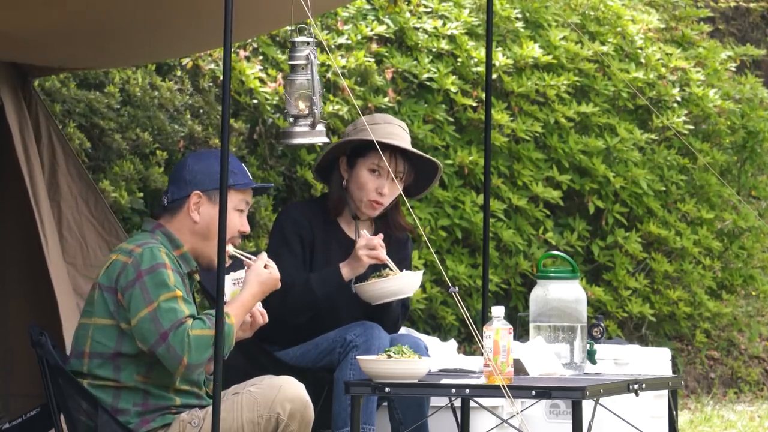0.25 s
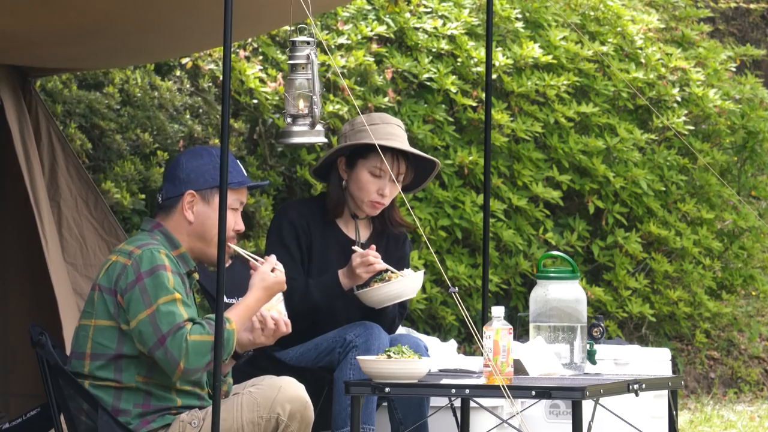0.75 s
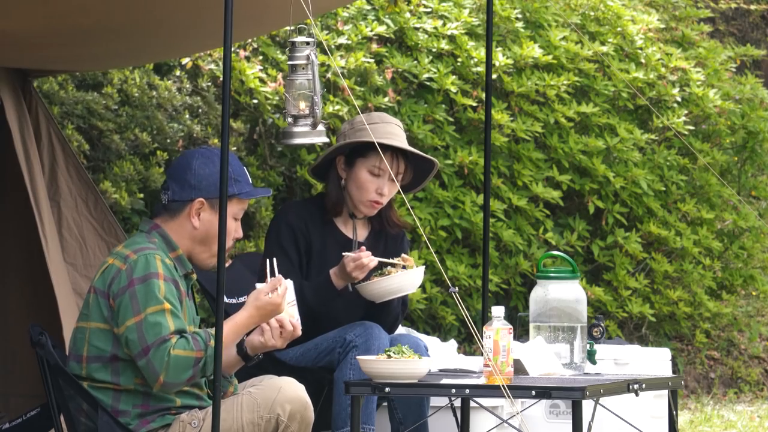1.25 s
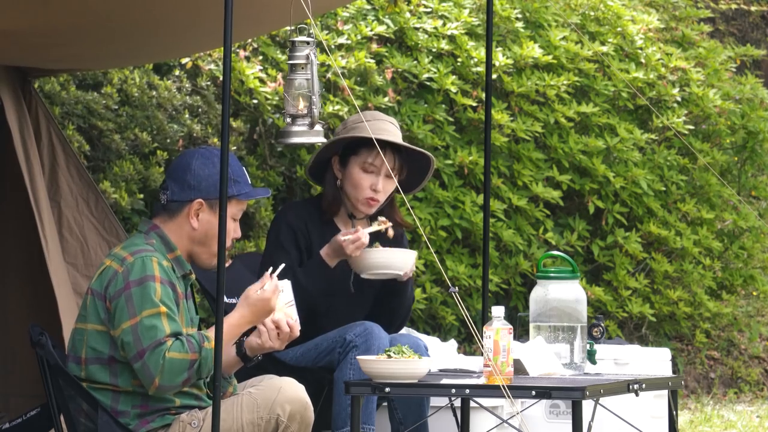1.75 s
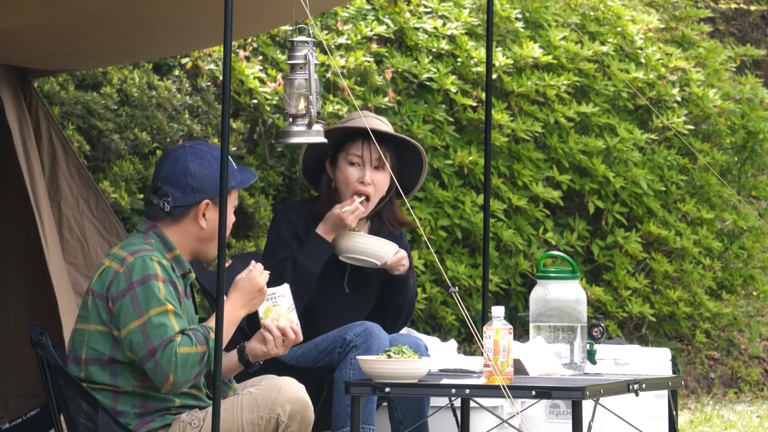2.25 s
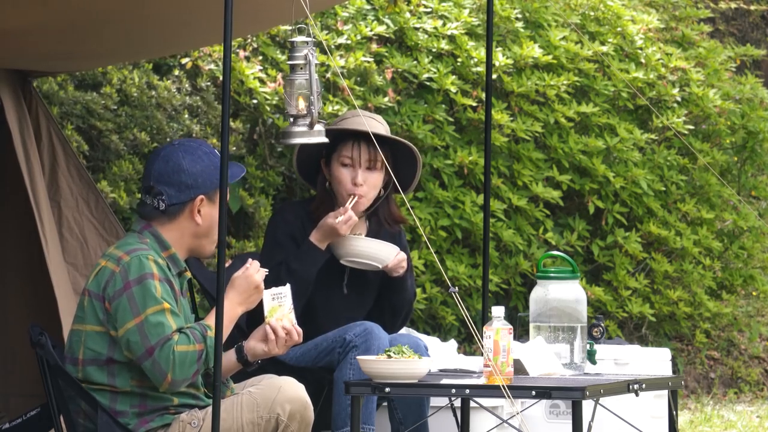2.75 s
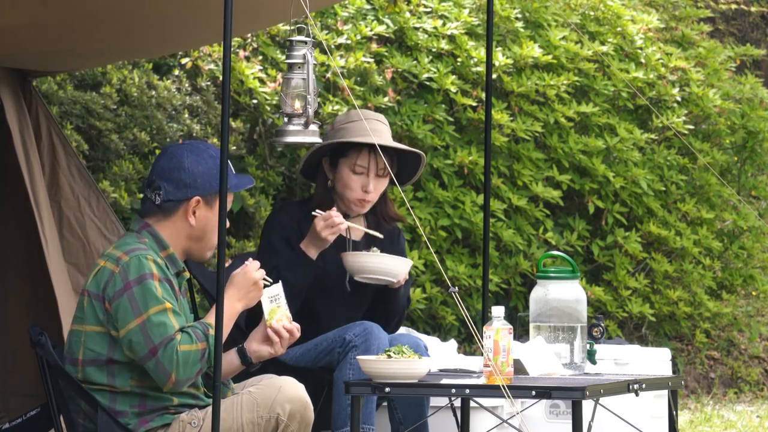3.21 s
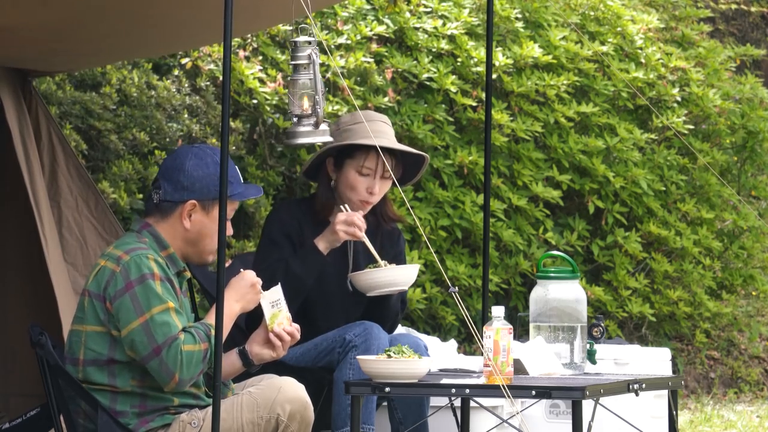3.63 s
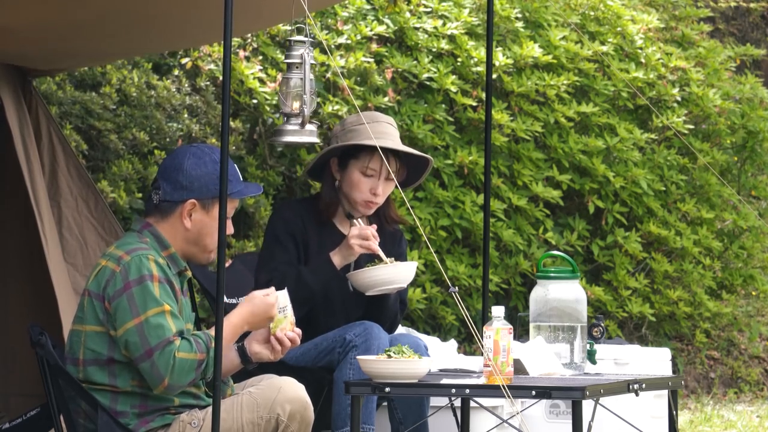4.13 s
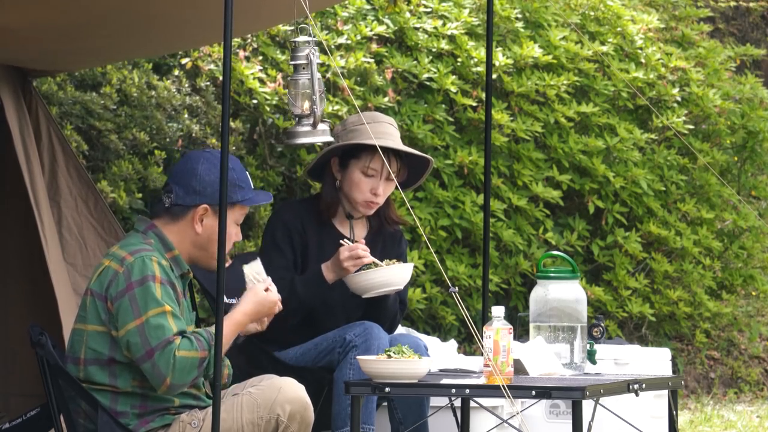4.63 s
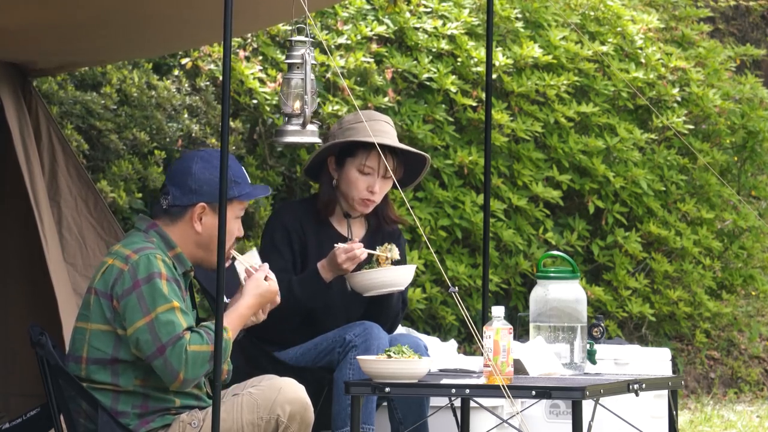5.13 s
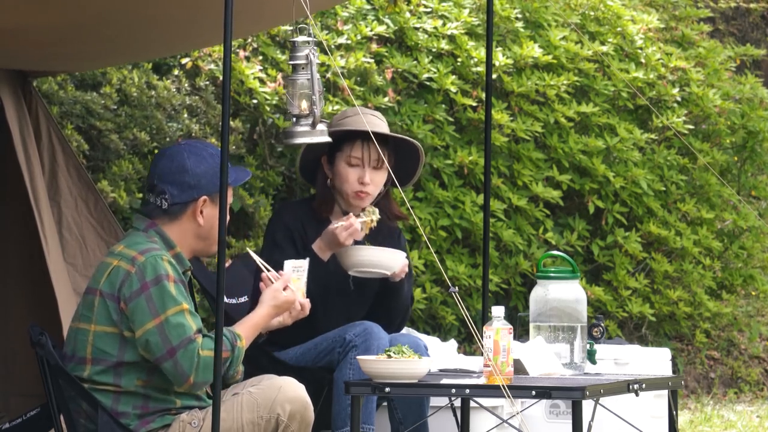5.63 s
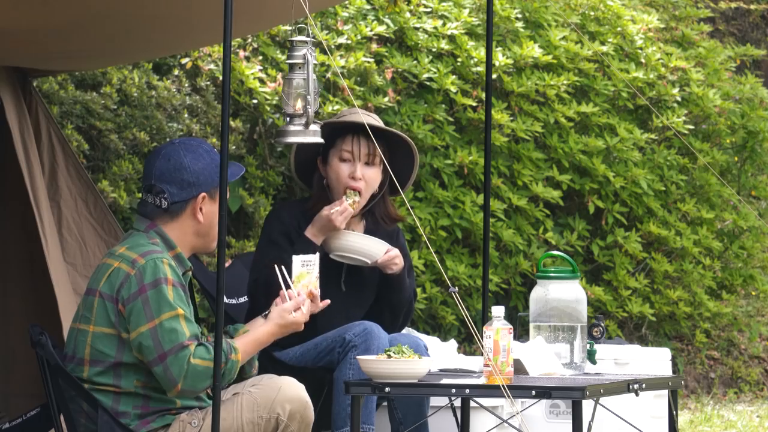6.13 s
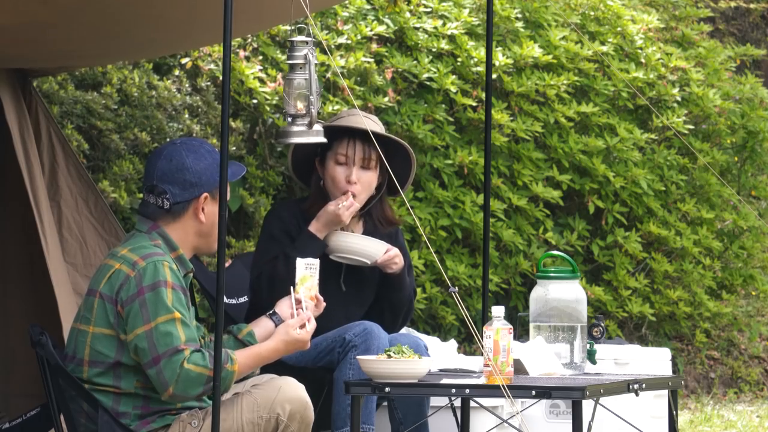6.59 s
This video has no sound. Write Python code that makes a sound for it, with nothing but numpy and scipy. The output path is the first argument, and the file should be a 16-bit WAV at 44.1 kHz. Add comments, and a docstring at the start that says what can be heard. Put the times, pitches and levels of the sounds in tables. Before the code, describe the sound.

Outdoors at a camp site beside a leafy hedge, strong gusts strike an unprotected microphone. Very deep, soft-edged thumps and low flutter dominate, surging around one second, strongest near three and a half to four, then again towards the end. Between gusts the rumble falls away, leaving a quiet, smooth rush of trees and a fine, dense rustle of near leaves straight ahead.

```python
"""A camp site beside a tall hedge, in gusty wind, with a two-port microphone out in the flow.
On the microphone, large eddies thump and small ones flutter: noise in bands, driven by the wind's strength.
Just after a gust peaks the flutter is at its finest, as large eddies take a moment to break up.
Behind, from straight ahead, the trees give a smooth rush of noise
and the near leaves a dense rustle of tiny ticks over hiss, which slowly dulls."""
import sys
import numpy as np
from scipy import signal
from scipy.fft import rfft, irfft, next_fast_len
from scipy.io import wavfile
from scipy.ndimage import uniform_filter1d

SR = 44100
rng = np.random.default_rng(int(sys.argv[2]) if len(sys.argv) > 2 else 0)


def wav_out(sig):
    """Save sig, one row per channel (or a flat mono array), as 16-bit PCM at SR to the path in sys.argv[1]."""
    wavfile.write(sys.argv[1], SR, np.round(np.clip(np.atleast_2d(sig).T, -1, 1) * 32767).astype(np.int16))


N = 302526

# Strength of the wind at the microphone, in four gusts:
# (time [s], level above the average breeze [dB])
WIND_STRENGTH = [(0.0, -2.5), (0.25, -3), (0.55, 3), (0.87, 4.5), (1.25, 1.5), (1.55, -7.0), (2.2, -4.5),
                 (2.65, -12), (3.05, -2.5), (3.4, 2), (3.72, 10), (3.98, 4.5), (4.35, -5.5), (4.8, -14.5),
                 (5.25, -1.5), (5.8, 4.5), (6.08, -0.5), (6.45, 0), (6.68, 5.5), (6.86, -1)]
# Single eddies that slap the microphone, before the slap gains set in scene():
# (time [s], deep thump level [dB], flutter level [dB])
EDDY_SLAPS = [(0.25, -7, -32), (0.39, -8.5, -29), (0.51, -17, -25), (0.79, -5.5, -25.5), (0.87, -24, -22),
              (1.19, -11.5, -24), (1.41, -8.5, -31), (1.78, -15, -34), (2.95, -15, -41), (3.23, -17, -20.5),
              (3.47, -12.5, -21), (3.61, -10, -17), (3.74, -6.5, -17), (3.94, -18, -19), (4.08, -9.5, -39),
              (4.18, -11.5, -38), (5.01, -10.5, -38), (5.28, -13, -29), (5.5, -9, -36), (5.64, -8, -24),
              (5.79, -22, -21), (5.9, -16.5, -20), (6.21, -8, -44), (6.35, -9, -38), (6.5, -7, -33),
              (6.66, -34, -22)]
# Spectrum of the large eddies, before tilt: (frequency [Hz], relative density [dB per Hz])
THUMP_SPECTRUM = [(8, -2), (14, 0.5), (22, 1.5), (32, -8), (45, -14), (64, -52), (90, -35), (130, -54)]
# Spectrum of the small eddies, before tilt: (frequency [Hz], relative density [dB per Hz])
FLUTTER_SPECTRUM = [(35, -8.5), (52, 2), (70, -2.5), (95, -8), (125, -11.5), (170, -22.5), (240, -33.5),
                    (400, -65)]
# Wind in the foliage, before the two trims below:
# (time [s], rush of the trees level [dB], rustle of the near leaves level [dB])
FOLIAGE_LEVELS = [(0.0, -40.5, -39.5), (0.25, -40.5, -40), (0.8, -39, -39.7), (1.6, -40, -41),
                  (2.6, -38.5, -40.5), (3.6, -37.6, -39), (3.72, -39.5, -40.5), (4.3, -39, -41.5),
                  (5.1, -38.1, -40.3), (6.3, -38, -40.0), (6.45, -40.5, -42), (6.86, -40.4, -42.5)]
# Spectrum of the rush in the trees: (frequency [Hz], relative density [dB per Hz])
TREE_SPECTRUM = [(60, 6), (130, 0.5), (220, 2), (310, -0.2), (430, -2.5), (540, -1.8), (680, -0.1),
                 (850, -1.5), (1100, -2.5), (1600, -4.5), (2200, -7), (3000, -12), (4500, -20.5)]
# Spectrum of the near leaves, before tilt: (frequency [Hz], relative density [dB per Hz])
LEAF_SPECTRUM = [(1800, -10.5), (2600, -2.5), (3300, -2), (4000, 0.04), (4600, 0.6), (5200, -0.7),
                 (5900, -4.5), (7000, -7), (8500, -10.5), (10000, -16), (12500, -23), (15500, -29.3)]

# Level in the average breeze [dB] and gain per dB of wind: small eddies grow faster than large ones
THUMP_DB, THUMP_PER_WIND = -17.5, 0.32
FLUTTER_DB, FLUTTER_PER_WIND = -32, 0.94
# Rise and fall of a slap [s]: the deep thump outlasts its flutter
THUMP_ATTACK_S, THUMP_RELEASE_S = 0.038, 0.049
FLUTTER_ATTACK_S, FLUTTER_RELEASE_S = 0.019, 0.02
# Tilt of the flutter in still air and its rise from there to the average breeze [dB per octave]
FINENESS_DB, FINENESS_PER_WIND = -7.5, 3.6
BREAKUP_S = 0.09  # delay while large eddies break up
OVERLOAD = 0.95  # limit of the microphone, full scale = 1
TREES_TRIM_DB, LEAVES_TRIM_DB = 1.59, 0.2
# Treble tilt of the rustle at the start [dB per octave] and its steady fall per second
CRISPNESS_DB, DULLING_DB_PER_S = 0.83, 0.27
CUTOFF_HZ = 15500


def buffeting(wind_db, large, small):
    """Wind on the microphone: the faster the air, the smaller the eddies and the higher the rumble reaches."""
    t = np.arange(N) / SR
    delayed_wind_db = np.interp(t - BREAKUP_S, t, wind_db)
    fineness_db = FINENESS_DB + FINENESS_PER_WIND * from_db(delayed_wind_db)
    thump = large * eddies(THUMP_SPECTRUM, 0.24 * fineness_db, pivot_hz=22, lumpy_db=0.8, span_s=0.093)
    flutter = small * eddies(FLUTTER_SPECTRUM, fineness_db, pivot_hz=75, lumpy_db=1.5, span_s=0.071)
    # the two ports feel nearly the same pressure, the left one a little more of the large eddies
    port_gains = from_db(0.17 * np.array([[1], [-1]]))
    return thump * port_gains + flutter


def port_swirl(large, small):
    """A little of the turbulence, mostly the deepest, pushes on one port while it pulls on the other."""
    deep_eddies = eddies(THUMP_SPECTRUM, -8.0, pivot_hz=22, lumpy_db=-1.0, span_s=0.13)
    fine_eddies = eddies(FLUTTER_SPECTRUM, 0, pivot_hz=75, lumpy_db=1, span_s=0.15)
    swirl = large * from_db(-14.5) * deep_eddies + small * from_db(-26) * fine_eddies
    return swirl * [[1], [-1]]


def turbulence(wind_db, thump_uneven_db, flutter_uneven_db, lumps_per_s, thump_slap_db, flutter_slap_db):
    """Strength of the large and the small eddies: both follow the wind in uneven lumps, with slaps on top."""
    large = from_db(THUMP_DB + THUMP_PER_WIND * wind_db + thump_uneven_db * drift(lumps_per_s))
    small = from_db(FLUTTER_DB + FLUTTER_PER_WIND * wind_db + flutter_uneven_db * drift(lumps_per_s))
    thump_slaps = from_db(thump_slap_db) * slaps(1, THUMP_ATTACK_S, THUMP_RELEASE_S)
    flutter_slaps = from_db(flutter_slap_db) * slaps(2, FLUTTER_ATTACK_S, FLUTTER_RELEASE_S)
    return np.hypot(large, thump_slaps), np.hypot(small, flutter_slaps)  # powers add


def slaps(column, attack_s, release_s):
    """Strength of the single eddies over time: each swells and dies away as a rounded bump."""
    t = np.arange(N) / SR
    power = 0
    for row in EDDY_SLAPS:
        age = t - row[0]
        width_s = np.where(age < 0, attack_s, release_s)
        bump = np.exp(-np.minimum((age / width_s) ** 2, 50))
        power = power + from_db(row[column]) ** 2 * bump
    return np.sqrt(power)


def eddies(spectrum, tilt_db, pivot_hz, lumpy_db, span_s):
    """Turbulent pressure: eddies of each size come in lumps; a rising tilt favours the small ones."""
    shared_lumps = drift(16)
    pressure = 0
    for hz, band in bands(rng.standard_normal(N), spectrum, count=7):
        level_db = tilt_db * np.log2(hz / pivot_hz) + lumpy_db * (shared_lumps + drift(9.1))
        pressure = pressure + band * from_db(level_db)
    return steadied(pressure, span_s)


def steadied(x, span_s):
    """Hold the short-term power of a turbulent flow near 1, so that the gust alone sets its strength."""
    power = abs(signal.hilbert(x, next_fast_len(N))[:N]) ** 2 / 2
    width = max(int(span_s * SR), 2)
    smooth_power = uniform_filter1d(uniform_filter1d(power, width), width)
    return x / np.sqrt(smooth_power + 1e-20)


def rounded(pressure):
    """The strongest thumps drive the microphone to its limit, which rounds their tops."""
    return pressure / (1 + (pressure / OVERLOAD) ** 6) ** (1 / 6)


def leaves(touches_per_s, spread_db, patchy_db, pivot_hz):
    """Near leaves brush each other: dense tiny ticks of uneven size over a bed of hiss."""
    tilt_db = CRISPNESS_DB - DULLING_DB_PER_S * np.arange(N) / SR
    sizes = from_db(spread_db * np.minimum(rng.exponential(1, N), 4))
    signed_sizes = sizes * rng.choice([-1, 1], N)
    ticks = rms_one(signed_sizes * (rng.random(N) < touches_per_s / SR))
    hiss = rng.standard_normal(N)
    rustle = 0
    for hz, band in bands(0.67 * ticks + hiss, LEAF_SPECTRUM, count=10):
        octaves_up = max(np.log2(hz / pivot_hz), 0)  # the tilt acts above the pivot only
        rustle = rustle + band * from_db(tilt_db * octaves_up + patchy_db * drift(11.0))
    return rms_one(rustle)


def trees(patchy_db):
    """Countless far leaves merge into a smooth rush that wavers slightly from band to band."""
    rush = 0
    for hz, band in bands(rng.standard_normal(N), TREE_SPECTRUM, count=12):
        rush = rush + band * from_db(patchy_db * drift(4.6))
    return rms_one(rush)


def bands(source, spectrum, count):
    """Colour a source and split it into overlapping neighbour bands: (centre Hz, signal) for each."""
    size = next_fast_len(N)
    hz = np.maximum(np.arange(size // 2 + 1) * SR / size, 1)
    coloured = rfft(source, size) * from_db(at_hz(spectrum, hz))
    centres = np.geomspace(spectrum[0][0], spectrum[-1][0], count)
    place = np.log(hz / centres[0]) / np.log(centres[1] / centres[0])  # in band spacings
    for k, centre in enumerate(centres):
        triangle = np.maximum(1 - abs(place - k), 0)
        yield centre, irfft(coloured * triangle, size)[:N]


def drift(rate):
    """Slow chance with spread 1, changing roughly rate times a second."""
    step = 40  # samples between the points drawn
    r = np.exp(-2 * np.pi * rate * step / SR)
    noise = rng.standard_normal(N // step + 2002)
    slow = signal.lfilter([1], [1, -2 * r, r * r], noise)[2000:]  # drop the filter's start
    return np.interp(np.arange(N) / step, np.arange(len(slow)), rms_one(slow))


def in_time(rows):
    """Each column of a curve at every sample."""
    s, *columns = np.transpose(rows)
    return [np.interp(np.arange(N) / SR, s, c) for c in columns]


def at_hz(points, hz):
    """Read a spectrum on a log-frequency axis."""
    point_hz, point_db = np.transpose(points)
    return np.interp(np.log(hz), np.log(point_hz), point_db)


def from_db(db):
    """Decibels to gain."""
    return 10 ** (np.asarray(db) / 20)


def rms_one(x):
    """Scale to rms 1."""
    return x / np.sqrt(np.mean(x ** 2) + 1e-20)


def scene():
    """The wind blows on the microphone itself; the foliage lies straight ahead."""
    wind_db, = in_time(WIND_STRENGTH)
    large, small = turbulence(wind_db, thump_uneven_db=2.2, flutter_uneven_db=2.5, lumps_per_s=9,
                              thump_slap_db=0.1, flutter_slap_db=1.2)
    wind = rounded(buffeting(wind_db, large, small) + port_swirl(large, small))

    rush_db, rustle_db = in_time(FOLIAGE_LEVELS)
    near_leaves = leaves(touches_per_s=9000, spread_db=2.5, patchy_db=0.37, pivot_hz=4800)
    rustle = from_db(rustle_db + LEAVES_TRIM_DB) * near_leaves
    rush = from_db(rush_db + TREES_TRIM_DB) * trees(patchy_db=0.37)
    return wind + rustle + rush


def record(dry):
    """The top is cut steeply; a 3 ms fade opens the sound without a click."""
    opening = np.minimum(np.arange(N) / (0.003 * SR), 1)
    top_cut = signal.ellip(12, 0.1, 90, CUTOFF_HZ, fs=SR, output="sos")
    return signal.sosfilt(top_cut, dry * opening)


dry = scene()
out = record(dry)
wav_out(out)
```